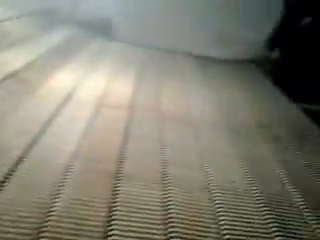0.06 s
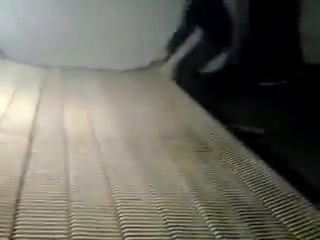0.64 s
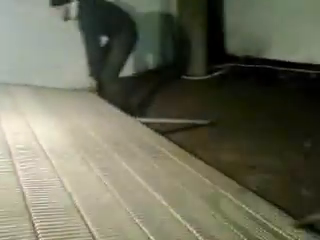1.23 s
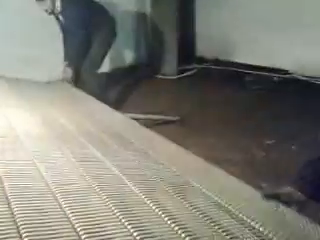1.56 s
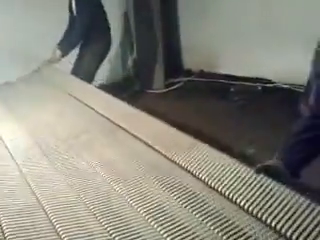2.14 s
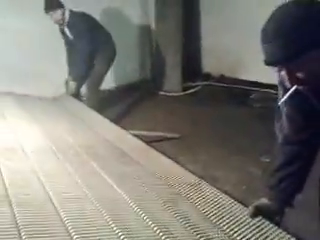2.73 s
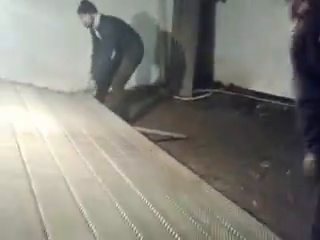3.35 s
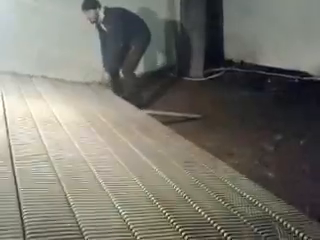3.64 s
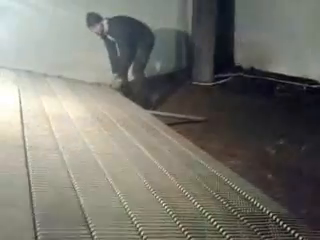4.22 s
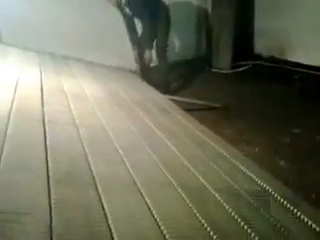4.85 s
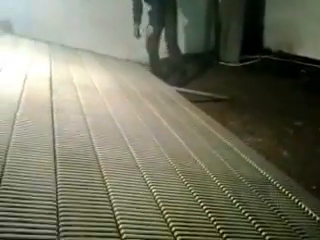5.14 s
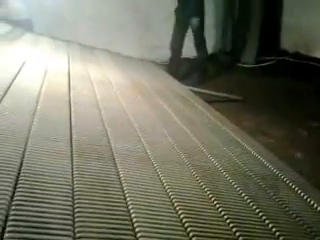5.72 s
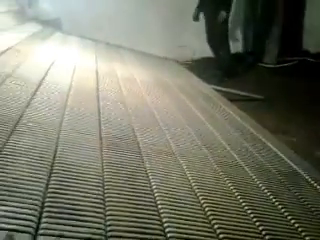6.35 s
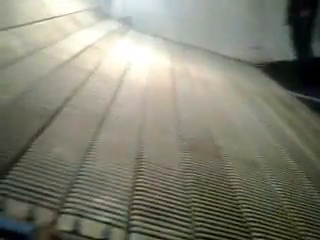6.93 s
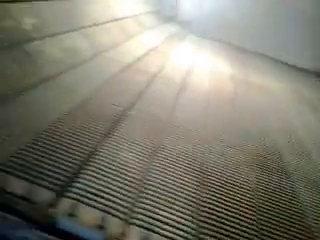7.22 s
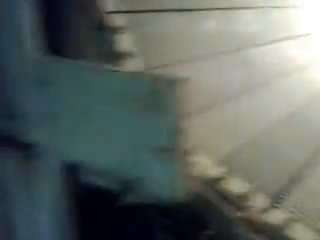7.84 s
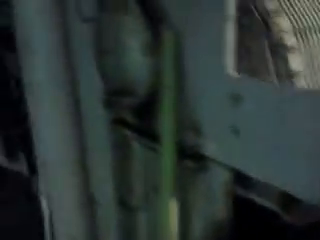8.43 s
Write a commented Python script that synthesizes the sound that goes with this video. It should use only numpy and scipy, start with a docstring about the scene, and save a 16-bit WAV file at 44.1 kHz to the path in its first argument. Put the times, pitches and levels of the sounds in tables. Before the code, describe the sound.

In a hard-walled industrial room with machinery humming, a hollow steel beam clangs and rings. A ribbed metal section slams onto a deck with a loud clatter, another scrapes with thin pings and crashes down too. Lighter knocks and faint scrapes follow. Near the end a small steel part is struck once and rings brightly. The slams distort a small, narrow-sounding microphone.

```python
"""Laying a ribbed metal deck.

Workers lay long sections side by side in a hard-walled industrial room where machinery hums. A section
is dragged in stick-slip friction, tips over and slams down: its ribs clatter and drive the many modes of
the deck. Lighter knocks seat it. A hollow beam and, later, a small steel part are struck and ring in
their own damped modes. The slams overload a small narrow-band microphone."""
import sys
import numpy as np
from scipy import signal
from scipy.fft import rfft, irfft
from scipy.io import wavfile
from scipy.ndimage import uniform_filter1d

SR = 44100
rng = np.random.default_rng(int(sys.argv[2]) if len(sys.argv) > 2 else 0)


def wav_out(sig):
    """Save sig, one row per channel (or a flat mono array), as 16-bit PCM at SR to the path in sys.argv[1]."""
    wavfile.write(sys.argv[1], SR, np.round(np.clip(np.atleast_2d(sig).T, -1, 1) * 32767).astype(np.int16))


N = 373968
TIME = np.arange(N) / SR

# Rush of air from the machinery. Each row: frequency in Hz, relative spectral density in dB.
AIR_SPECTRUM = [(30, -24), (110, -34), (170, -15.5), (280, -7), (440, 2.5), (560, -6.5), (860, 2),
                (1450, -4.5), (2400, -8), (3200, -2.5), (4000, -3.5), (4700, -15), (5700, -12.5),
                (7000, -27)]
# Motor tones. Each row: frequency in Hz, relative level in dB.
MOTOR_TONES = [(619.1, -43), (861.3, -39.5), (1152, -44.5), (1707, -43), (1922, -49), (1986, -42),
               (2891, -56), (2993, -46), (3155, -46), (3214, -39.5), (3273, -54), (3478, -42), (3795, -46),
               (3914, -47.5)]
# Modes of a hollow steel beam. Each row: frequency in Hz, relative level in dB, T60 in seconds.
BEAM_MODES = [(414, -30.5, 3.4), (481.5, -20.5, 1.7), (512, -29.5, 2.5), (973, -21.5, 3.6),
              (1064, -14, 1.5), (1387, -26.5, 2.3), (1452, -20.5, 1.5), (1470, -29, 1.3), (1582, -19, 1.6),
              (1985, -30, 0.88), (2450, -17, 0.79), (3330, -35, .9)]
# Clusters of close modes in the beam. Each row: centre in Hz, width in Hz, relative level in dB.
BEAM_MODE_CLUSTERS = [(496, 65, -2), (976, 110, 0), (1490, 240, -4), (1994, 93, -7), (2510, 76, -0.5),
                      (3290, 88, -6)]
# The opening blow on the hollow beam, then sections landing or knocked home.
# Each row: start in seconds, relative level in dB, length in seconds.
IMPACTS = [(0.064, -13, .06), (0.944, 2, 0.2), (1.385, -13.5, 0.057), (2.2, -23.5, 0.27), (2.594, 0.5, 0.2),
           (3.757, -16.5, 0.021), (3.926, -10.5, .004), (3.941, -7.5, 0.014), (4.005, -15.5, 0.029),
           (4.118, -14, 0.028)]
# Spectrum of metal parts meeting. Each row: frequency in Hz, relative level in dB.
CLATTER_SPECTRUM = [(100, -44), (250, -26), (500, -11.5), (900, -13.5), (1500, -8), (2200, -6.5),
                    (3200, -0.5), (4000, -4), (4800, -8), (6000, -11.5), (7200, -22)]
# Spectrum of the deck's dense ringing. Each row: frequency in Hz, relative level in dB.
DECK_SPECTRUM = [(100, -33), (220, -17.5), (400, -1.5), (800, -3), (1600, 0), (2200, -2.5), (3200, 3),
                 (4300, -4), (4700, -6), (5800, -14.5), (7200, -25.5)]
# Decay of the deck between its peaks. Each row: frequency in Hz, T60 in seconds.
DECK_DECAY = [(150, 3.9), (500, 2.3), (1400, 2.74), (2800, 1.68), (4200, 1.71), (5500, 1.34), (7200, 1.7)]
# Deck resonances that stand out and ring longer. Each row: centre in Hz, width in Hz, lift in dB.
DECK_RESONANCES = [(620, 50, 2.5), (1350, 30, 3.5), (1593, 50, 2), (1930, 55, 4.5), (2510, 130, 2.5),
                   (3222, 73, 3), (3350, 50, 1), (3900, 40, 2.5), (4267, 140, 8), (4400, 36, 3),
                   (5240, 130, 5.5), (6700, 150, 3.5)]
# Reverberation of the room. Each row: frequency in Hz, T60 in seconds.
ROOM_DECAY = [(200, .9), (1000, 1), (3500, 0.78), (7000, 0.62)]
# Sections dragged and nudged. Each row: start in seconds, relative level in dB, length in seconds.
SLIDES = [(0.68, -17.5, 0.034), (1.832, -18, 0.057), (2.035, -17.5, 0.054), (2.11, -18.5, 0.08),
          (2.182, -13, 0.032), (4.43, -32, 0.19), (4.818, -19.5, 0.045), (5.008, -17.5, 0.042),
          (5.42, -28, 0.056), (5.8, -31.5, .047), (8.245, -24, 0.045)]
# Spectrum of ribs sliding. Each row: frequency in Hz, relative level in dB.
FRICTION_SPECTRUM = [(120, -33), (500, -5), (1200, -9), (2000, -10.5), (3100, -1.5), (3900, -5),
                     (5000, -12.5), (7200, -27.5)]
# Resonances of a loose section's ribs. Each row: centre in Hz, width in Hz, relative level in dB.
RIB_RESONANCES = [(2470, 140, -1.5), (3120, 99, 2), (3560, 60, -5), (3780, 200, -2.5), (4064, 46, 3.5),
                  (4570, 31, 0.5)]
# Ribs that catch and spring free. Each row: start in seconds, frequency in Hz, level in dB.
RIB_RELEASES = [(2.055, 4479, -31), (2.199, 4081, -23), (2.205, 4479, -15), (2.23, 2492, -23),
                (5.04, 3020, -21.5)]
# Spectrum of the blow on the small steel part. Each row: frequency in Hz, relative level in dB.
BLOW_SPECTRUM = [(100, -27), (350, -7), (750, 0), (1300, -3), (2000, -2), (3200, 3.5), (4200, -8),
                 (5500, -13.5), (7200, -20)]
# Modes of that part. Each row: frequency in Hz, relative level in dB, T60 in seconds.
SMALL_PART_MODES = [(970, -27, 0.99), (2239, -32, 1.0), (2980, -21.5, 1.15), (3280, -14.5, 0.63),
                    (3478, -36, .5), (3585, -28, .28), (4161, -25, 0.5), (4740, -21.5, 0.86),
                    (5950, -35.5, 0.97), (7000, -42, .8)]

MIC_TOP_HZ = 7100


def undb(db):
    """Amplitude ratio of a level in decibels."""
    return 10 ** (np.asarray(db) / 20)


def unit(x):
    """Normalisation to rms 1."""
    return x / np.sqrt(np.mean(x ** 2) + 1e-18)


def decay(t, t60):
    """Exponential damping: 60 dB in t60 seconds."""
    return np.exp(-np.log(1000) * t / t60)


def along(points, hz):
    """Interpolation of (Hz, value) points on a log-frequency axis."""
    f, value = np.transpose(points)
    return np.interp(np.log(hz + 1), np.log(f), value)


def resonances(peaks, hz):
    """Level in dB of superposed Lorentzian resonance curves."""
    return 20 * np.log10(sum(undb(db) / (1 + (2 * (hz - f) / width) ** 2) for f, width, db in peaks))


def colour(x, spectrum, tilt_db=0):
    """Spectral shaping, tilted by tilt_db per octave about 3 kHz, at rms 1."""
    hz = np.fft.rfftfreq(len(x), 1 / SR)
    octaves = np.log2(np.clip(hz, 200, 8000) / 3000)
    gain = undb(along(spectrum, hz) + tilt_db * octaves) * (hz < 8000)
    return unit(irfft(rfft(x) * gain, len(x)))


def wander(rate_hz):
    """Smooth random modulation at rms 1."""
    k = max(int(SR / rate_hz), 2)
    steps = np.repeat(rng.standard_normal(N // k + 1), k)
    return unit(uniform_filter1d(uniform_filter1d(steps, k), k)[:N])


def add(track, start, x):
    """Superposition of x on the track from start seconds."""
    i = max(int(start * SR), 0)
    track[i:i + len(x)] += x[:N - i]


def dense_response(db_of, t60_of):
    """Overlapping modes respond as noise that decays at its own rate in each band; energy 1."""
    hz, t, cells = signal.stft(rng.standard_normal(3 * SR), SR, nperseg=2048)
    gain = undb(db_of(hz)[:, None] - 60 * t / t60_of(hz)[:, None])
    response = signal.istft(cells * gain, SR)[1]
    return response / np.sqrt(np.sum(response ** 2))


def excite(force, response):
    """A linear system convolves its input with its impulse response."""
    return signal.fftconvolve(force, response)[:N]


def struck(modes, start, build_s, waver_db, waver_rad):
    """Free vibration: damped modes build up and fade, wavering as their echoes interfere."""
    t = np.maximum(TIME - start, 0)
    out = np.zeros(N)
    for hz, db, t60 in modes:
        amplitude = undb(db + waver_db * wander(16)) * decay(t, t60)
        out += amplitude * np.sin(2 * np.pi * hz * t + waver_rad * wander(25))
    return out * (1 - np.exp(-t / build_s))


def contacts(bursts, spectrum, per_s, scatter_db):
    """Shot noise: bursts of tiny random impacts give a direct sound and a force on the structure."""
    sound, force = np.zeros(N), np.zeros(N)
    t = TIME[:3 * SR // 2]
    for start, db, length, rise, t60, coupling_db, tilt_db in bursts:
        impacts = (rng.random(len(t)) < per_s / SR) * np.sign(rng.standard_normal(len(t)))
        impacts *= undb(scatter_db * rng.standard_normal(len(t)))
        envelope = np.minimum(t / rise, 1) * decay(np.maximum(t - max(length, rise), 0), t60)
        add(sound, start, colour(impacts, spectrum, tilt_db) * envelope * undb(db))
        add(force, start, unit(impacts) * envelope * undb(db + coupling_db))
    return sound, force


def machinery(ripple_db, flutter_db, flutter_rad):
    """Flow noise is filtered by the fixed resonances of ducts; motor tones waver above it."""
    hz = np.fft.rfftfreq(N, 1 / SR)
    duct_ripple = np.interp(hz, np.arange(400) * 20, rng.standard_normal(400))
    air = colour(irfft(rfft(rng.standard_normal(N)) * undb(ripple_db * duct_ripple), N), AIR_SPECTRUM)
    tones = np.zeros(N)
    for f, db in MOTOR_TONES:
        waver_db = flutter_db * (wander(3.03) + wander(22)) / np.sqrt(2)  # slow swell, quick flutter
        phase = 2 * np.pi * f * TIME + flutter_rad * wander(28)
        tones += undb(db + waver_db) * np.sqrt(2) * np.sin(phase)
    # The microphone is carried away from the air and past the spot where the tones are strongest.
    air_db = -22 - 0.5148 * TIME + 0.58 * wander(5.9)
    tones_db = -.5 + 1.5 * np.exp(-((TIME - 6.5) / 1.1) ** 2)
    return undb(air_db) * air + undb(tones_db) * tones


def deck_afterring():
    """Free decay: the deck's dense modes still ring from earlier work."""
    return colour(rng.standard_normal(N), DECK_SPECTRUM) * undb(-15.5) * decay(TIME, t60=4.1)


def beam_clang(start, modes_db, clusters_db, clusters_t60, build_s):
    """Modal vibration of a hollow beam: a few clear modes sound amid clusters of weaker ones."""
    t = np.maximum(TIME - start, 0)
    hz = np.fft.rfftfreq(N, 1 / SR)
    clusters = unit(irfft(rfft(rng.standard_normal(N)) * undb(resonances(BEAM_MODE_CLUSTERS, hz)), N))
    clusters *= (1 - np.exp(-t / build_s)) * decay(t, clusters_t60)
    modes = struck(BEAM_MODES, start, build_s, waver_db=2.5, waver_rad=0.89)
    return undb(clusters_db) * clusters + undb(modes_db) * modes


def metal_impacts():
    """Impact excitation: the blow on the beam, then ribs hitting their neighbours, drive the deck."""
    def lift_db(hz):
        return sum(db / (1 + (2 * (hz - f) / width) ** 2) for f, width, db in DECK_RESONANCES)
    bursts = []
    for start, db, length in IMPACTS:
        # The longer the clatter, the slower it builds and settles, and the more the deck takes up.
        rise, t60 = .0015 + .055 * length, 0.34 + 1.18 * length
        coupling_db = -7.5 + 20.5 * length
        tilt_db = -0.48 + .12 * db  # harder blows are brighter
        bursts.append((start, db, length, rise, t60, coupling_db, tilt_db))
    clatter, force = contacts(bursts, CLATTER_SPECTRUM, per_s=2500, scatter_db=3)
    deck = dense_response(lambda hz: along(DECK_SPECTRUM, hz) + lift_db(hz) - 60 * (hz > MIC_TOP_HZ),
                          lambda hz: along(DECK_DECAY, hz) * (1 + 0.066 * lift_db(hz)))
    return clatter, excite(force, deck)


def sliding_sections():
    """Stick-slip friction: ribs catch and slip on each other, ringing the loose section."""
    bursts = []
    for start, db, length in SLIDES:
        rise, t60 = 0.2 * length, 0.23
        lifted = 1.5 < start < 2.6  # a lifted section rings freely; lying on the deck it is damped
        coupling_db = -.5 if lifted else -10.5
        tilt_db = -3.5 - 0.2954 * db  # lighter touches are thinner
        bursts.append((start, db, length, rise, t60, coupling_db, tilt_db))
    rasp, force = contacts(bursts, FRICTION_SPECTRUM, per_s=1200, scatter_db=1.0)
    ribs = dense_response(
        lambda hz: np.maximum(resonances(RIB_RESONANCES, hz), along(FRICTION_SPECTRUM, hz) - 13),
        lambda hz: np.full(len(hz), .95))
    return rasp, excite(force, ribs)


def rib_pings():
    """Plucking: each rib that springs free vibrates in a single damped mode."""
    return sum(struck([(hz, db, .65)], start, build_s=.008, waver_db=-2.0, waver_rad=0.65)
               for start, hz, db in RIB_RELEASES)


def small_part_blow(start, db, t60, echo_s, echo_db, room_db):
    """Reflection: a hard blow close by returns as an echo from the far wall and as reverberation."""
    burst = rng.standard_normal(N) * (TIME >= start) * decay(np.abs(TIME - start), t60)
    onset_gain = undb(db) * np.sqrt(t60 / (2 * np.log(1000)) * SR / N)  # db holds at the first instant
    crack = onset_gain * colour(burst, BLOW_SPECTRUM)
    wash = dense_response(lambda hz: along(BLOW_SPECTRUM, hz) - 60 * (hz > MIC_TOP_HZ),
                          lambda hz: along(ROOM_DECAY, hz))
    out = crack + undb(echo_db) * np.roll(crack, int(echo_s * SR))
    add(out, start, undb(room_db) * np.sqrt(np.sum(crack ** 2)) * wash)
    return out


def small_part_ring(start):
    """Free vibration: the struck steel part rings in inharmonic modes."""
    return undb(2) * struck(SMALL_PART_MODES, start, build_s=0.014, waver_db=-0.5, waver_rad=.3)


def scene():
    """Superposition: contact noise and its reverberation add to the ringing metal and the machinery."""
    clatter, deck = metal_impacts()
    rasp, ribs = sliding_sections()
    strike_s = 7.553
    blow = small_part_blow(strike_s, db=-4.5, t60=0.035, echo_s=0.053, echo_db=-9.0, room_db=4.5)
    room = dense_response(np.zeros_like, lambda hz: along(ROOM_DECAY, hz))
    direct = undb(-1.5) * (clatter + rasp)
    clang = beam_clang(start=.06, modes_db=5.5, clusters_db=-12.0, clusters_t60=2.87, build_s=0.066)
    metal = deck + ribs + clang + small_part_ring(strike_s) + deck_afterring()
    hum = machinery(ripple_db=3.0, flutter_db=1.5, flutter_rad=0.91)
    mono = direct + excite(direct, room) + blow + metal + hum + rib_pings()
    return np.array([mono, mono])


def record(dry):
    """Overload: a narrow-band microphone clips on the slams; the top of the distortion is softened."""
    ceiling, treble_edge_hz, treble_db, top_hz = 0.69, 7840, -9, 15900
    narrow = signal.sosfilt(signal.ellip(8, .3, 80, MIC_TOP_HZ, fs=SR, output="sos"), dry)
    clipped = np.clip(narrow, -ceiling, ceiling)
    body = signal.sosfiltfilt(signal.butter(10, treble_edge_hz, fs=SR, output="sos"), clipped)
    softened = body + undb(treble_db) * (clipped - body)
    return signal.sosfiltfilt(signal.ellip(10, .1, 60, top_hz, fs=SR, output="sos"), softened)


dry = scene()
out = record(dry)
wav_out(out)
```